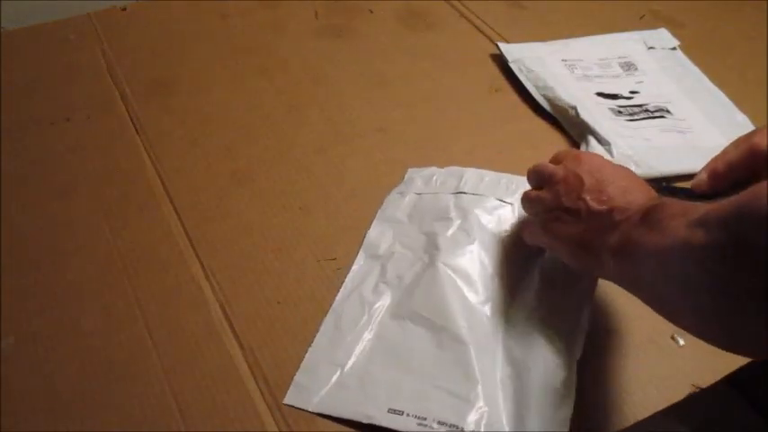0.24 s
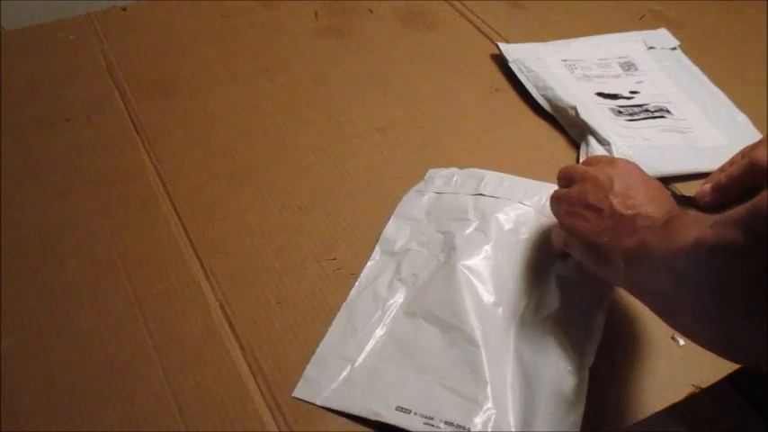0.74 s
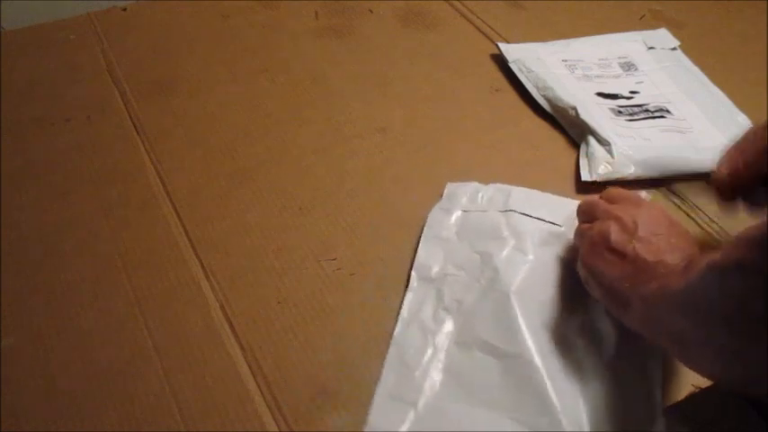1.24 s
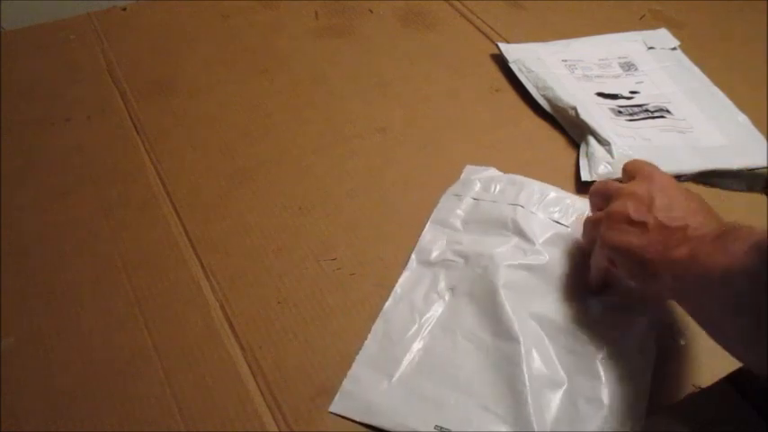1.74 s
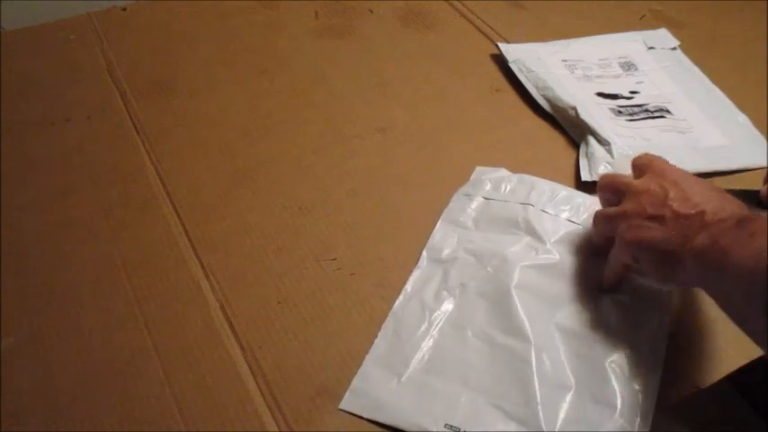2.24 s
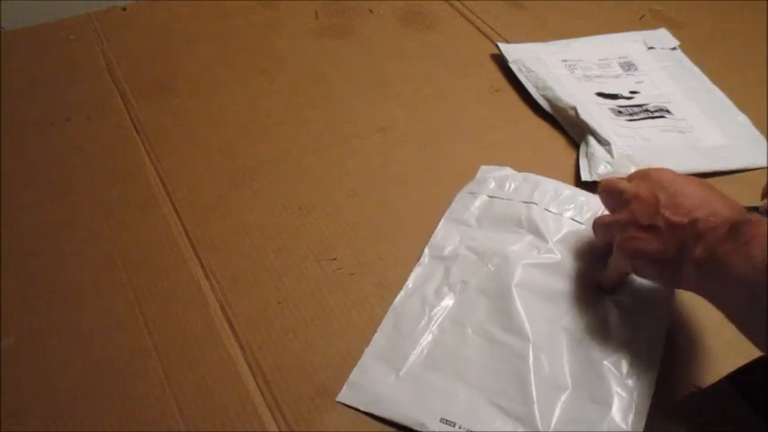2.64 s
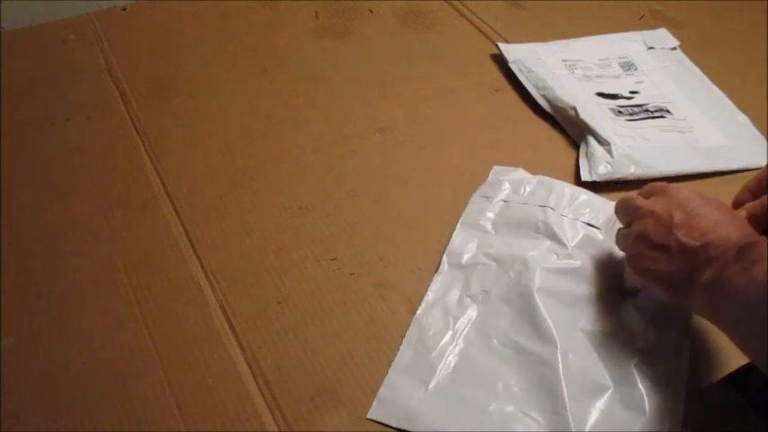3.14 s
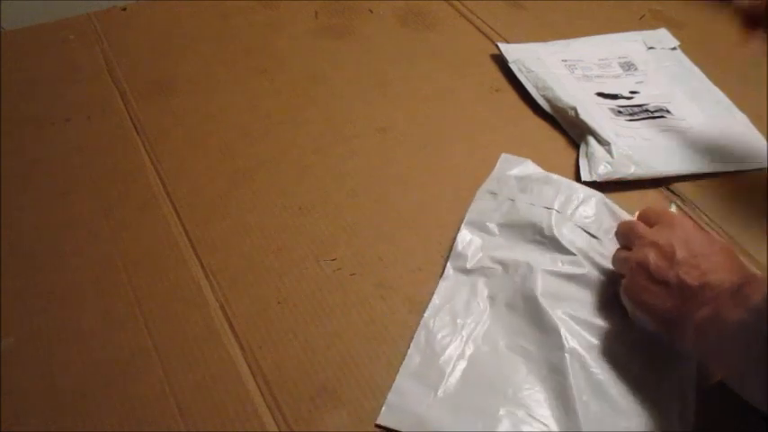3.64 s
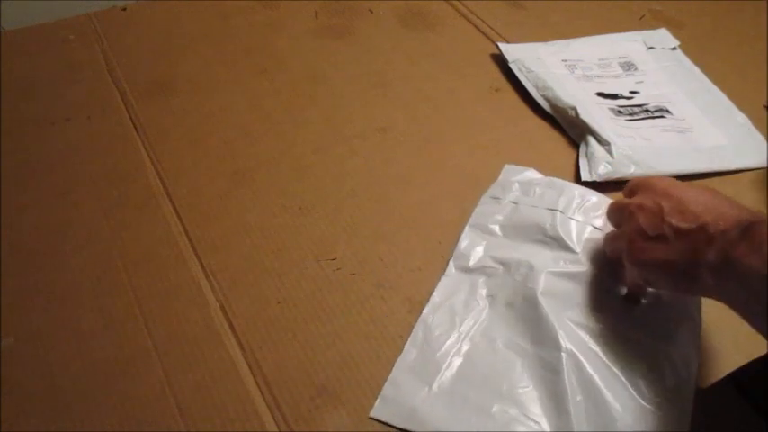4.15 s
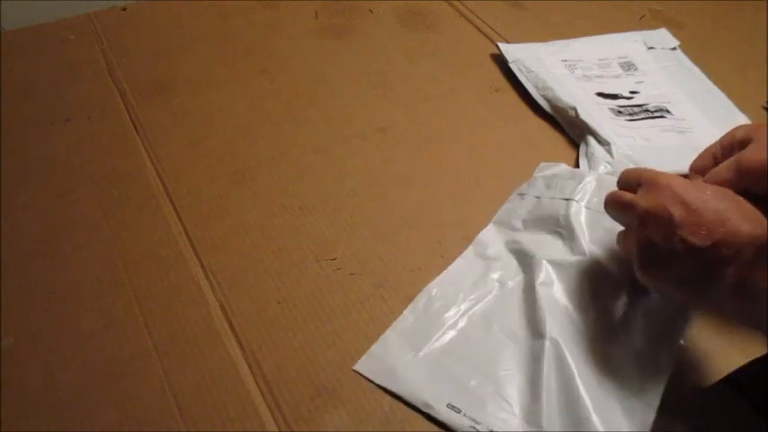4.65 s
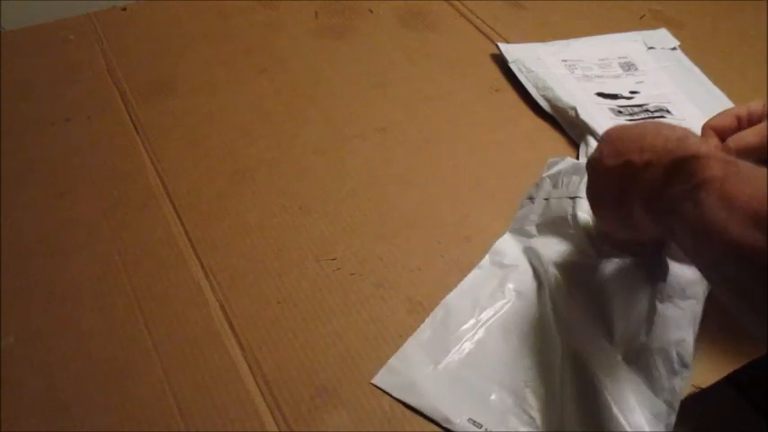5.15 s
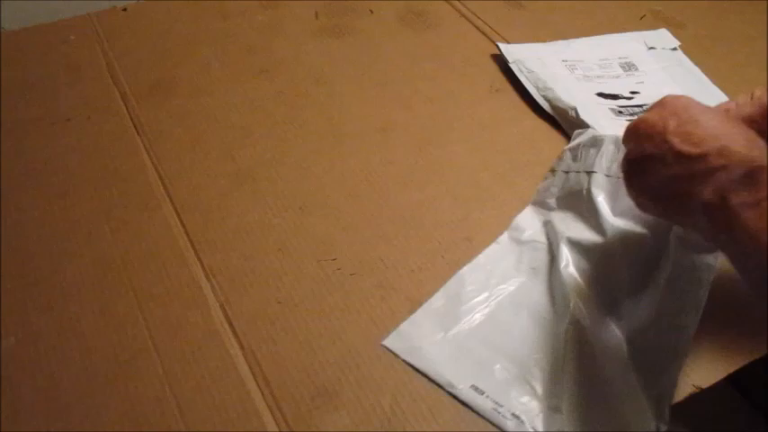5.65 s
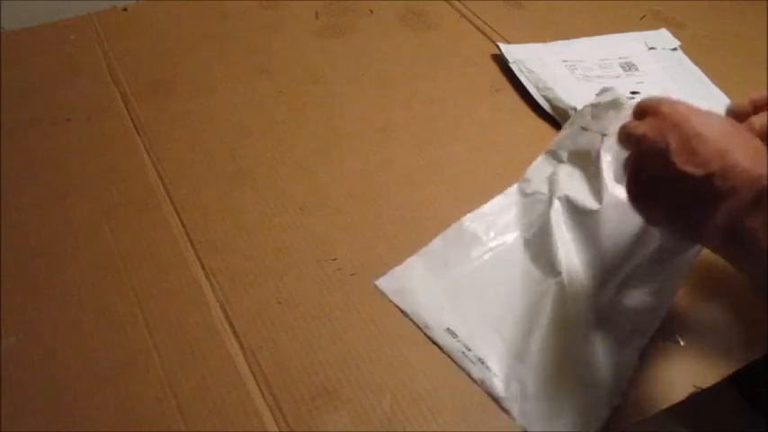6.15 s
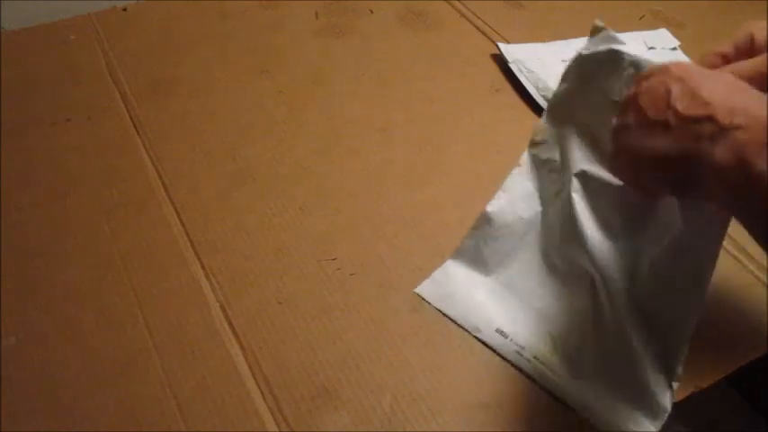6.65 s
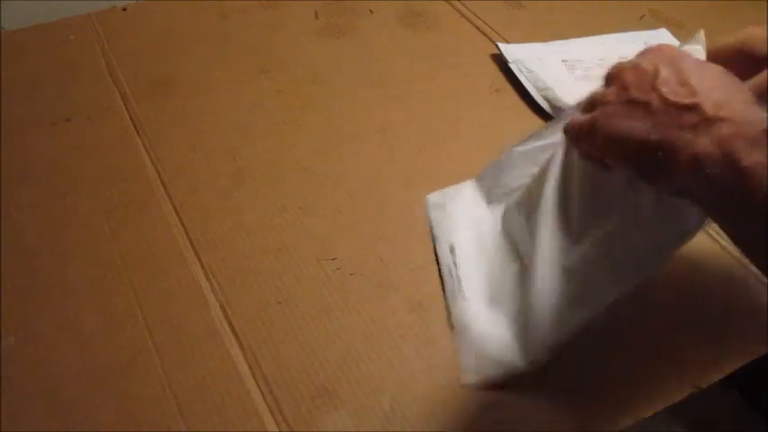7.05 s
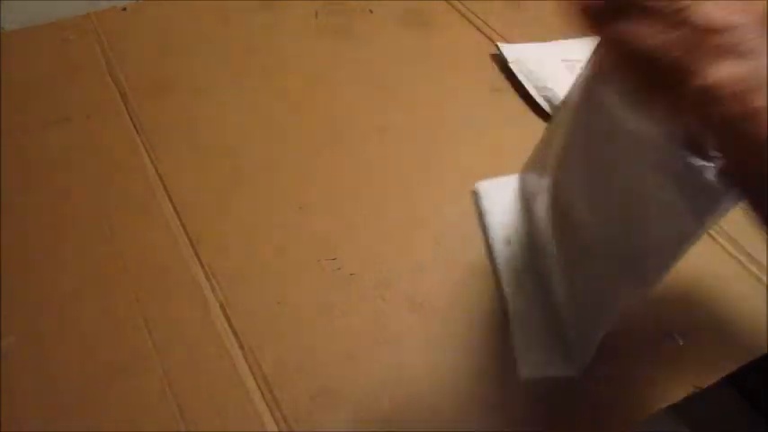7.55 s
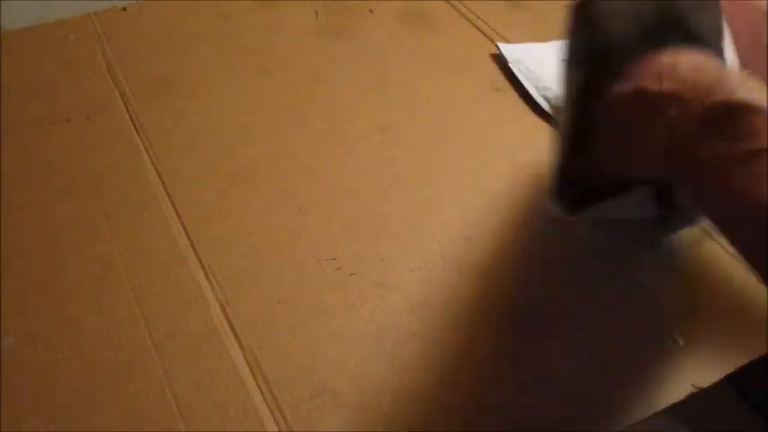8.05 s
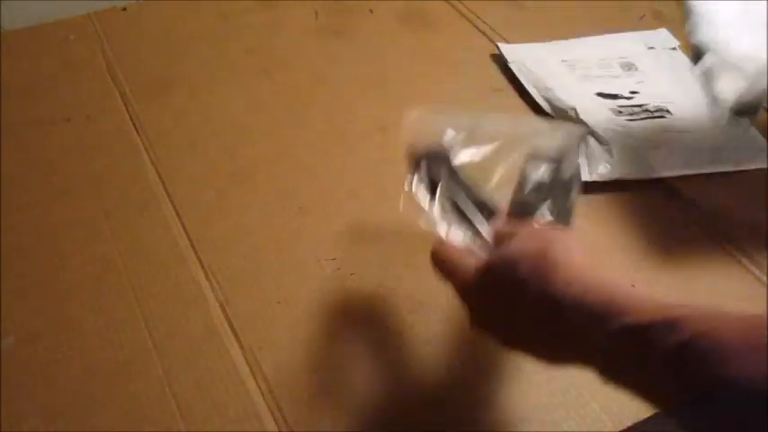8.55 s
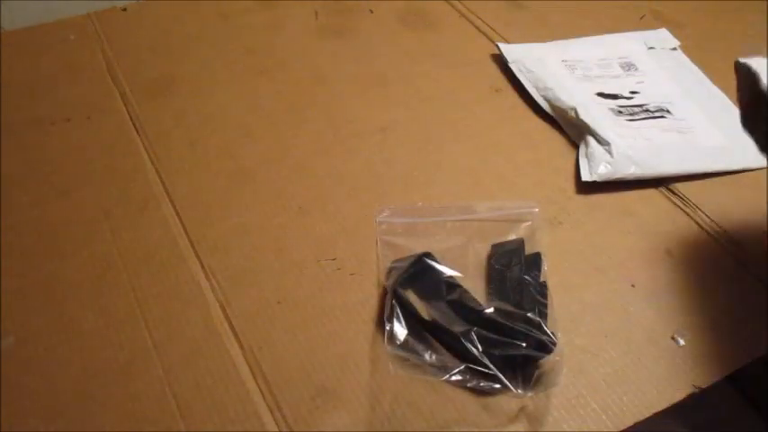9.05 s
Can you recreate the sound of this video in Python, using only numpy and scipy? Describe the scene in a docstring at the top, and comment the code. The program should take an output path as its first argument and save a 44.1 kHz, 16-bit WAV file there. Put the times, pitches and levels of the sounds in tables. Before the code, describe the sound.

Close up in a small, live room, fingers pick at a plastic mailer with light crackles and sharp snaps. A hand tool knocks and rattles on a cardboard-covered table early on, then again in a short cluster. The crinkling grows into loud, flapping pulls as the mailer opens, then a clear bag of hard parts lands with a dry clack and the film is put aside, over a faint steady hush.

```python
"""A plastic mailer is picked at and pulled open on a cardboard-covered table in a small, live room.
From the start the film snaps in decaying sines and noise, rustles in clumps of tiny creases, and slides as
filtered noise, over a steady hush. Soon a hand tool knocks: damped modes, a table thud and a noise rattle.
Late on, a clear bag of hard parts, drawn out, drops with modes of its own and a crinkle; then the empty
mailer is put aside."""
import sys
import numpy as np
from scipy import signal
from scipy.fft import rfft, irfft, next_fast_len
from scipy.io import wavfile
from scipy.ndimage import map_coordinates

SR = 44100
rng = np.random.default_rng(int(sys.argv[2]) if len(sys.argv) > 2 else 0)


def pcm_store(signal):
    """Save signal as 16-bit PCM."""
    levels = np.round(np.clip(np.atleast_2d(signal), -1, 1) * 32767)
    wavfile.write(sys.argv[1], SR, levels.astype(np.int16).T)


N = 410130
TOP_HZ = 16000  # band limit

# blows of the tool: (time [s], clack [dB], thud [dB], rattle [dB])
TOOL_HITS = [(1.267, -30, -46, -10.5), (1.273, -15, -41, -17), (1.2798, -6.5, -37, -7),
             (3.574, -7.5, -41, -7), (3.596, -7, -25.5, -11), (4.008, -33, -26, -31),
             (4.062, -4.5, -17, -9), (4.073, -12, -13, -5), (4.11, -11.5, -21, -13.5),
             (4.163, -21, -18.5, -21), (4.185, -35, -27, -15.5), (4.235, -33, -29.5, -19.5)]
# spectrum of creasing film: (frequency [Hz], relative density [dB])
CRINKLE = [(150, -45.5), (370, -8.5), (600, -5.5), (830, -1.5), (1050, 0), (1600, -0.5), (2400, -3.5),
           (3500, -9), (5500, -19), (16000, -45)]


def amp(db):
    """Amplitude factor of a level in dB."""
    return 10 ** (np.asarray(db) / 20)


def unit(x):
    """x scaled to rms 1."""
    return x / np.sqrt(np.mean(x ** 2) + 1e-20)


def along(points, hz):
    """(Hz, value) points interpolated on a log frequency axis."""
    f, v = np.transpose(points)
    return np.interp(np.log(hz + 1), np.log(f + 1), v)


def curves(rows):
    """One value per sample for each column after the time."""
    s, *cols = np.transpose(rows)
    return [np.interp(np.arange(N) / SR, s, c) for c in cols]


def wobble(knots_per_s):
    """A smooth random curve."""
    knots = rng.standard_normal(int(N * knots_per_s / SR) + 4)
    return map_coordinates(knots, [np.arange(N) * knots_per_s / SR])


def add(track, s, sound):
    """Mix a sound into the track at time s."""
    space = track[max(round(s * SR), 0):][:len(sound)]
    space += sound[:len(space)]


def coloured(x, spectrum, size=4096):
    """x through a causal minimum-phase filter of energy 1 with this spectrum."""
    cepstrum = irfft(np.log(amp(along(spectrum, np.fft.rfftfreq(size, 1 / SR)))))
    # fold the cepstrum onto positive time
    cepstrum[1:size // 2] *= 2
    cepstrum[size // 2 + 1:] = 0
    pulse = irfft(np.exp(rfft(cepstrum)))
    return signal.fftconvolve(x, pulse / np.linalg.norm(pulse))[:len(x)]


def burst(t60_s, size=2048):
    """A dying puff of noise with energy 1."""
    puff = rng.standard_normal(size) * amp(-60 * np.arange(size) / SR / t60_s)
    return puff / np.linalg.norm(puff)


def handling():
    """Relative dB of crinkle, crisp edge and flapping: each event builds, holds and fades over fingering."""
    # idle fingering of the film: (time [s], relative crinkle [dB])
    fidget = [(0, -50), (0.08, -66), (0.45, -62), (0.62, -52), (1.2, -51), (1.68, -58), (2.1, -63),
              (2.55, -59), (3.0, -54), (3.85, -51), (4.3, -41), (4.5, -53), (5.2, -52), (6.02, -53),
              (7.0, -44), (8.6, -43), (8.9, -56), (9.3, -56)]
    # grabs and pulls of the film, and the bag's crinkle as it lands at 8.723 s:
    # (time at full force [s], hold [s], relative crinkle [dB], attack [s], release [s],
    # crisp edge re crinkle [dB], flapping re crinkle [dB])
    efforts = [(0.137, .025, -46, .02, .08, -10, -18), (0.61, .04, -47, .1, .05, -16, -2),
               (0.667, .02, -46, .02, .1, 2, -14), (0.759, .03, -41, .02, .2, 1, -20),
               (0.95, .09, -43, .1, .25, -10, -15), (1.288, .07, -36, .02, .2, -6, -12),
               (1.46, .11, -43, .03, .1, -8, -13), (1.73, .06, -46, .02, .1, -11, -11),
               (1.864, .085, -44, .04, .1, -5, -11.5), (2.195, .025, -45, .03, .05, -10, -10),
               (2.41, .06, -49, .03, .1, -8, -15), (2.621, .04, -45, .08, .17, -6, -24),
               (2.835, .03, -41, .05, .16, -5, -19), (3.04, .12, -43, .06, .2, -4, -20),
               (3.28, .05, -44, .03, .1, -6, -6), (3.445, .03, -34, .13, .1, -10, -21),
               (3.55, .08, -30, .04, .11, -3, -10), (3.98, .05, -31, .04, .1, -15, -7),
               (4.1, .08, -33, .05, .2, -7, -5), (4.349, .06, -42, .1, .14, 0, -25),
               (4.6, .15, -41, .06, .14, -8, -18), (4.861, .06, -38, .04, .18, -12, -7.5),
               (5.04, .03, -37, .08, .1, -4, -11), (5.195, .12, -47, .02, .05, -4, -17),
               (5.358, .03, -38, .04, .14, -10, -12), (5.471, .06, -42, .04, .1, -6, -6),
               (5.586, .065, -41, .04, .07, -2, -18), (5.794, .035, -31, .05, .25, -3, -5),
               (6.115, .05, -41, .04, .05, -10, -7), (6.24, .02, -40, .04, .1, -13, -20),
               (6.297, .045, -40, .02, .1, -6, -12), (6.41, .07, -30, .04, .14, -2, -9),
               (6.55, .02, -35, .03, .08, -10, -8), (6.681, .06, -34, .02, .1, -7, -13),
               (6.795, .055, -18, .09, .12, -6, -8.5), (7.14, .025, -30, .14, .1, -1, -12),
               (7.3, .04, -27, .07, .05, -2, -11), (7.374, .025, -17, .08, .1, -5, -5),
               (7.5, .18, -35, .03, .1, -10, -6.5), (7.75, .03, -23, .06, .1, -3, -8.5),
               (7.845, .06, -25, .04, .24, -4, -9.5), (8.095, .015, -23, .015, .09, -8, -5.5),
               (8.228, .025, -21, .03, .08, -6, -10.5), (8.315, .04, -21, .08, .2, -5, -10),
               (8.44, .05, -34, .04, .09, -1, -22), (8.723, .03, -30, .08, .13, -10, -15),
               (9.03, .12, -31, .015, .5, -9, -10.5)]
    fidget_edge_db, fidget_flap_db = -9, -2.5  # re idle crinkle
    fade_db = 20  # gained over an attack, lost over a release
    t = np.arange(N) / SR
    idle_db, = curves(fidget)
    power = np.outer(amp([0, fidget_edge_db, fidget_flap_db]), amp(idle_db)) ** 2
    for s, hold, db, attack, release, edge_db, flap_db in efforts:
        near = slice(*np.searchsorted(t, [s - 2 * attack, s + hold + 2 * release]))
        before = np.maximum(s - t[near], 0) / attack
        after = np.maximum(t[near] - s - hold, 0) / release
        effort_db = db - fade_db * (before + after)
        power[:, near] += np.outer(amp([0, edge_db, flap_db]), amp(effort_db)) ** 2
    return 10 * np.log10(power)


def creases(level_db, rate_per_s, pitch_hz, cycles, spread_db, crowding=.8, size=96):
    """Tiny facets flip at random as damped sines, more of them under harder work; rms 1."""
    density = amp(crowding * level_db)
    density /= density.mean()
    count = int(rate_per_s * N / SR)
    when, strength, pitch = rng.random((count, 3)).T
    start = np.minimum(np.searchsorted(np.cumsum(density), when * N), N - 1)
    hz = np.minimum(pitch_hz * 2 ** (2 * (2 * pitch - 1)), TOP_HZ)  # within two octaves
    turns = hz[:, None] * np.arange(size) / SR
    scatter_db = spread_db * np.minimum(-np.log(1 - strength), np.pi)
    # divide by density: the level is applied later
    gain = amp(scatter_db) * np.sqrt(hz / density[start])
    grains = gain[:, None] * np.sin(2 * np.pi * turns) * np.exp(-turns / cycles)
    samples = start[:, None] + np.arange(size)
    return unit(np.bincount(samples.ravel(), grains.ravel(), N)[:N])


def rustle(crinkle_db, crisp_db, flap_db):
    """Worked film: clumps of creases over the hiss of sliding, while the whole sheet flaps."""
    # spectra of the crisp edge and the flapping sheet: (frequency [Hz], relative density [dB])
    crisp = [(1200, -15.5), (3000, -0.5), (4300, -1), (6000, -1), (8000, -4.5), (10500, -7), (13000, -11),
             (16000, -19)]
    flap = [(40, -26), (90, -21.5), (150, -4), (230, -1), (420, -2.5), (600, -2), (1500, -44.5)]
    clump_db = 0.95 * wobble(80)
    body = creases(crinkle_db, rate_per_s=900, pitch_hz=1680, cycles=0.84, spread_db=5.0)
    body += amp(-14.5) * rng.standard_normal(N)  # sliding
    edge = creases(crisp_db, rate_per_s=600, pitch_hz=7440, cycles=0.81, spread_db=6)
    edge += amp(-4.5) * rng.standard_normal(N)
    film = amp(crinkle_db - 4.0) * unit(coloured(body, CRINKLE))
    film += amp(crisp_db - 3.5 + 2.2 * wobble(45)) * unit(coloured(edge, crisp))
    flapping = unit(coloured(rng.standard_normal(N), flap))
    sheet = amp(flap_db - 1.5 + 2.0 * wobble(30)) * flapping
    return amp(clump_db) * film + sheet


def buckles(crinkle_db):
    """Rows (s, facet Hz, pop dB, ridge Hz, crack dB): loud buckles, and chance ones that follow the crinkle."""
    # loud buckles: (listed time [s], relative level [dB], facet [Hz], pop re level [dB], ridge [Hz],
    # crack re level [dB])
    loud = [(0.124, -28.5, 1610, -9, 4270, -29), (0.137, -24, 1856, -9.5, 4840, -14.5),
            (0.21, -29.5, 1160, -9, 4060, -32), (0.294, -21, 990, -8.5, 4080, -22),
            (0.666, -18.5, 1970, -15, 4850, -14), (0.755, -10, 1160, -16, 8300, -12.5),
            (0.829, -24.5, 1770, -16, 8180, -11), (0.86, -19, 931, -13, 5310, -21),
            (0.948, -28, 603, -5, 5980, -19), (0.962, -16.5, 1140, -8.5, 4450, -23),
            (1.023, -1, 1790, -19.5, 5350, -17.5), (1.136, -27.5, 940, -7.5, 4090, -16),
            (1.155, -25.5, 1780, -10.5, 6210, -11.5), (1.331, -14.5, 1330, -10.5, 4340, -12.5),
            (1.353, -14.5, 1640, -7, 5670, -19.5), (1.442, -21.5, 1370, -19, 4110, -15),
            (1.465, -17, 799, -11.5, 4400, -16.5), (1.489, -22, 1400, -9, 4420, -25),
            (1.564, -16, 2290, -12, 4230, -15), (1.725, -24.5, 980, -11, 5620, -16),
            (2.312, -25.5, 1340, -8.5, 5990, -22), (2.41, -30, 791, -8, 4710, -18),
            (2.437, -27.5, 2070, -9.5, 5320, -16), (2.47, -24, 1150, -22, 4000, -14),
            (2.612, -19.5, 970, -14, 6850, -15.5), (2.635, -14.5, 880, -9.5, 5700, -26),
            (2.78, -21, 1360, -14, 6200, -13.5), (2.835, -14.5, 974, -16, 4400, -12),
            (3.052, -20, 2300, -13, 5920, -11), (3.078, -12.5, 1400, -11, 4100, -20),
            (3.159, -14, 965, -12.5, 5260, -19), (3.27, -16.5, 1330, -10.5, 6540, -27),
            (3.308, -17.5, 930, -12.5, 5140, -14), (3.429, -18.5, 1190, -12, 4740, -16),
            (3.459, -17.5, 990, -8, 4410, -15.5), (3.644, -12, 1350, -6, 5250, -25),
            (3.668, -16, 1150, -7, 4180, -33), (3.764, -12.5, 2460, -19, 5450, -13.5),
            (3.844, -28.5, 940, 0, 5630, -19), (3.879, -24, 1360, -9, 4260, -23),
            (3.946, -12.5, 2140, -11.5, 5170, -18), (3.971, -15, 1280, -8, 4680, -31),
            (4.38, -15, 1290, -14, 6070, -14), (4.399, -13.5, 842, -19, 6060, -12.5),
            (4.47, -23, 2160, -12, 4000, -25), (4.541, -24.5, 1160, -8, 4330, -15),
            (4.554, -20.5, 931, -13, 4350, -14), (4.613, -11.5, 2080, -9, 4370, -13),
            (4.692, -16.5, 1060, -11, 4090, -19), (4.734, -11.5, 1480, -10.5, 4360, -16),
            (4.758, -21, 1550, -5, 4300, -18), (4.844, -29.5, 1020, -4, 4430, -15),
            (5.004, -19.5, 1150, -10.5, 5580, -23), (5.044, -15.5, 850, -12, 4380, -14),
            (5.351, -14, 800, -11.5, 4540, -15), (5.463, -27, 676, -9, 5400, -18),
            (5.527, -19, 3000, -10, 4000, -14.5), (5.704, -17.5, 1510, -8.5, 4290, -19),
            (5.788, -7, 1190, -11.5, 5770, -14.5), (5.823, -12, 1690, -11, 4150, -14),
            (6.065, -23, 825, -6.5, 4170, -19), (6.115, -17, 2180, -10.5, 4240, -15.5),
            (6.313, -13.5, 1210, -10.5, 5530, -23), (6.387, -17.5, 875, -3, 4000, -30),
            (6.405, -11, 980, -10.5, 4000, -16.5), (6.431, -8, 1290, -8, 4800, -14),
            (6.665, -8, 1960, -14, 5100, -15.5), (6.781, -5.5, 1160, -9, 4460, -11.5),
            (6.899, -18, 1020, -28, 4290, -11), (7.011, -15.5, 1070, -8.5, 5440, -13.5),
            (7.077, -13, 1690, -10, 4160, -17), (7.151, -11.5, 805, -17, 10100, -12),
            (7.305, -4.5, 1160, -14.5, 6030, -14.5), (7.387, -7, 1100, -9, 4120, -13.5),
            (7.599, -16, 1000, -5.5, 5800, -21), (7.724, -13, 1160, -7.5, 4090, -12),
            (7.792, -6, 867, -18, 8800, -15), (8.095, -5.5, 950, -16, 4900, -12.5),
            (8.278, -9, 904, -27, 4510, -11.5), (8.484, -16.5, 1740, -34, 4330, -11.5),
            (8.639, -20, 977, -10.5, 5760, -12.5), (9.139, -19, 1060, -23, 5070, -9)]
    snap_delay_s = 0.000897  # loud snaps start this long after their listed time
    small_per_s, small_scatter_db = 9, 1
    small_pop_db, small_crack_db = 2.5, -0.5  # re the crinkle of the moment
    small_facet_hz, small_ridge_hz = 1280, 5470  # mid pitch, varied by half an octave each way
    rows = []
    for s, db, facet_hz, pop_db, ridge_hz, crack_db in loud:
        rows.append((s + snap_delay_s, facet_hz, db + pop_db, ridge_hz, db + crack_db))
    for when, size, strength in rng.random((int(small_per_s * N / SR), 3)):
        db = crinkle_db[int(when * N)] + small_scatter_db * (2 * strength - 1)
        pitch = 2 ** (size - .5)
        rows.append((when * N / SR, small_facet_hz * pitch, db + small_pop_db,
                     small_ridge_hz * pitch, db + small_crack_db))
    return rows


def flip(hz, cycles, size=1024):
    """A stiff patch of film swings for a cycle or so; energy 1."""
    turns = hz * np.arange(size) / SR
    swing = np.sin(2 * np.pi * turns) * np.exp(-turns / cycles)
    return swing / np.linalg.norm(swing)


def snaps(crinkle_db):
    """A large facet pops and its ridge cracks, each with a noise burst from the wrinkles around it."""
    # spectrum of the cracks: (frequency [Hz], relative density [dB])
    crack = [(500, -15), (2500, 1), (4500, 2), (6200, 3.5), (8000, 2.5), (10500, 0), (13000, -5),
             (16000, -14)]
    pops, cracks = np.zeros(N), np.zeros(N)
    for s, facet_hz, pop_db, ridge_hz, crack_db in buckles(crinkle_db):
        add(pops, s, amp(pop_db + 17.5) * flip(facet_hz, cycles=1.8))
        add(pops, s, amp(pop_db + 17.0) * coloured(burst(t60_s=0.025), CRINKLE))
        add(cracks, s, amp(crack_db + 15.5) * flip(ridge_hz, cycles=0.97))
        add(cracks, s, amp(crack_db + 18.0) * burst(t60_s=0.0045))
    return pops + coloured(cracks, crack)


def tail():
    """The room's answer to one spot: near walls at once, then a short decay; energy 1."""
    # reverberation: (frequency [Hz], t60 [s])
    decay = [(100, 0.065), (400, 0.11), (1000, 0.21), (2800, 0.23), (7000, 0.19), (15000, 0.18)]
    hz, t, z = signal.stft(rng.standard_normal(SR // 2), SR, nperseg=256)
    fade = amp(-60 * t / along(decay, hz)[:, None])
    echo = signal.istft(z * fade, SR, nperseg=256)[1]
    age = np.arange(len(echo)) / SR
    echo *= (1 - np.exp(-age / 0.00053)) * (1 + 0.23 * np.exp(-age / 0.023))
    return echo / np.linalg.norm(echo)


def room(x, count=10):
    """Sound leaves from ever-changing spots, each with its own echo pattern."""
    shares = np.exp(2 * np.array([wobble(70) for _ in range(count)]))
    shares /= np.linalg.norm(shares, axis=0)
    return sum(signal.oaconvolve(x * share, tail())[:N] for share in shares)


def hush():
    """Steady background: coloured noise."""
    # spectrum: (frequency [Hz], relative density [dB])
    spectrum = [(20, -0.5), (60, 2.5), (130, 1), (250, -9), (500, -9.5), (1000, -5), (2000, -14),
                (4500, -20), (9000, -24.5), (16000, -34)]
    return amp(-50.5) * unit(coloured(rng.standard_normal(N), spectrum))


def bounces(hits, loss_db, count=4):
    """Every blow is followed by ever quicker, weaker contacts."""
    first_flight_s, shrink = 0.0065, 0.98  # shrink: each flight over the last
    flights = first_flight_s * shrink ** np.arange(count)
    delays = np.cumsum(flights) - flights
    return [(s + delay, *(np.array(levels) - k * loss_db))
            for s, *levels in hits for k, delay in enumerate(delays)]


def ring(modes, attack_s, scatter_db=3.0):
    """One blow on an object: its damped modes at fresh strengths, peak 1."""
    t = np.arange(SR // 4) / SR
    hz, db, t60 = np.transpose(modes)[:, :, None]
    strength = amp(db + scatter_db * rng.standard_normal(hz.shape) - 60 * t / t60)
    waves = strength * np.sin(2 * np.pi * (hz * t + rng.random(hz.shape)))
    sound = np.sum(waves, axis=0) * (1 - np.exp(-t / attack_s))
    return sound / np.abs(sound).max()


def knocks(hits, modes, rattle_t60_s):
    """A hard thing clacks and rattles on the cardboard; the table top thuds under it."""
    # table modes: (frequency [Hz], relative level [dB], t60 [s])
    table = [(77.5, -8, 0.29), (100, -12, 0.043), (136, 5.5, 0.088), (167, -9, 0.063), (236, 2.5, 0.13),
             (274, 2, 0.21), (362, 1.5, 0.12), (506, 3, 0.019), (650, -9.5, .06)]
    # rattle spectrum: (frequency [Hz], relative density [dB])
    rattle = [(300, -18.5), (1200, 0.5), (2000, 2), (3300, 0), (3800, -5), (4500, -3), (5200, -3),
              (6400, -12), (7500, -12), (10200, -9), (11500, -17), (16000, -20)]
    solid, loose = np.zeros(N), np.zeros(N)
    for s, clack_db, thud_db, rattle_db in hits:
        add(solid, s, amp(clack_db) * ring(modes, attack_s=0.00018))
        add(solid, s, amp(thud_db) * ring(table, attack_s=0.0013))
        add(loose, s, amp(rattle_db + 9.5) * burst(t60_s=rattle_t60_s))
    return solid + coloured(loose, rattle)


def blade():
    """The harder the tool rattles, the more its steel blade rings."""
    # blade modes: (frequency [Hz], relative level [dB], t60 [s])
    blade_modes = [(1890, 3.5, 0.054), (3860, -10, 0.086), (4350, -3, 0.044), (4240, -9, 0.12),
                   (6630, -2, 0.049)]
    steel = np.zeros(N)
    for s, _, _, rattle_db in TOOL_HITS:
        add(steel, s, amp(4.54 * rattle_db + 13.5) * ring(blade_modes, attack_s=0.00047))
    return steel


def tool():
    """The hand tool knocks and bounces on the table, its blade ringing."""
    # tool modes: (frequency [Hz], relative level [dB], t60 [s])
    tool_modes = [(534, -4, 0.047), (790, 8.5, 0.014), (1000, -7.5, 0.063), (1134, 3.5, 0.02),
                  (1330, -28, 0.0056), (1740, 9, 0.0056), (2180, -3.5, 0.022), (2950, -4, 0.011),
                  (4100, -5, 0.017)]
    return knocks(bounces(TOOL_HITS, loss_db=3), tool_modes, rattle_t60_s=0.089) + blade()


def parts():
    """The bagged parts land; each bounce is far weaker than the last."""
    # landings: (time [s], clack [dB], thud [dB], rattle [dB])
    part_hits = [(8.697, 2, -49, -14), (8.7225, -3.5, -30, -9), (8.736, -12, -27, -20)]
    # part modes: (frequency [Hz], relative level [dB], t60 [s])
    part_modes = [(1083, -9, 0.009), (1300, -15, 0.0074), (1495, 1.5, 0.0084), (1650, -2, 0.012),
                  (1980, -8.5, 0.0063), (2310, -6.5, 0.009), (2830, -9, 0.0085), (3820, -27, 0.06)]
    return knocks(bounces(part_hits, loss_db=16), part_modes, rattle_t60_s=0.028)


def scene():
    """Film, tool and parts in the room, over its hush; the parts land nearest and sound driest."""
    crinkle_db, crisp_db, flap_db = handling()
    film = rustle(crinkle_db, crisp_db, flap_db) + snaps(crinkle_db)
    knocking = tool()
    landing = parts()
    echoes = room(film + amp(-4) * knocking + amp(-5) * landing)
    return (film + knocking + landing + amp(0.54) * echoes + hush())[None]


def record(dry):
    """Round off the highest peaks, then cut everything from the band limit up."""
    held = dry / (1 + (dry / .95) ** 6) ** (1 / 6)
    size = next_fast_len(N + SR // 2)
    passband = np.fft.rfftfreq(size, 1 / SR) < TOP_HZ
    return irfft(rfft(held, size) * passband, size)[:, :N]


dry = scene()
out = record(dry)
pcm_store(out)
```